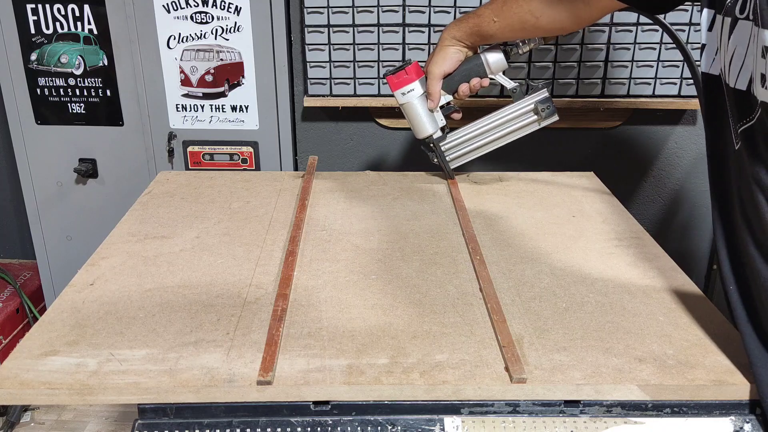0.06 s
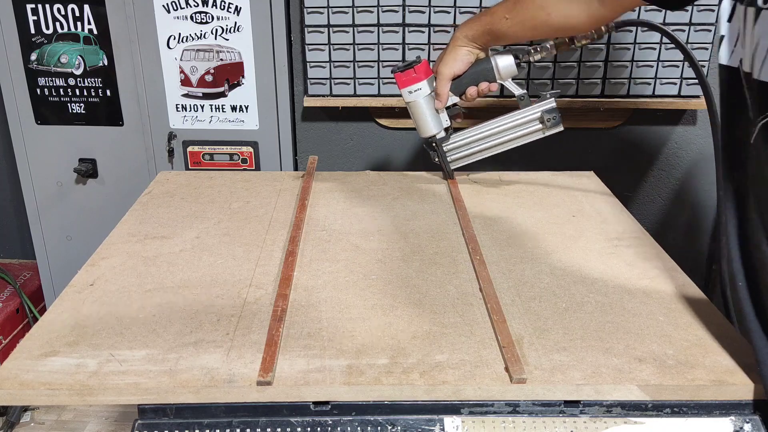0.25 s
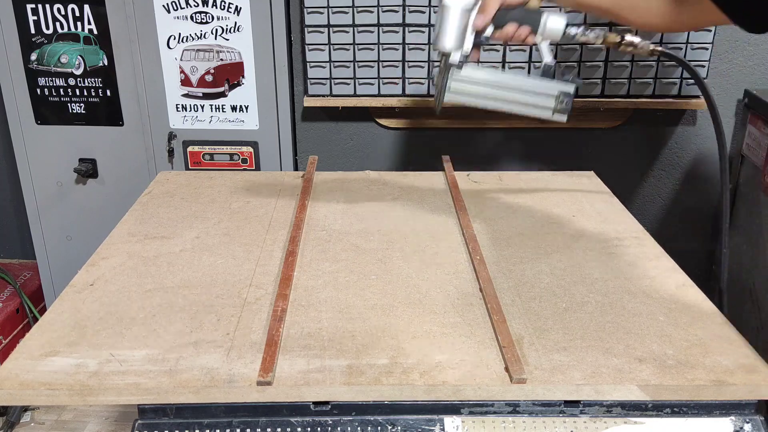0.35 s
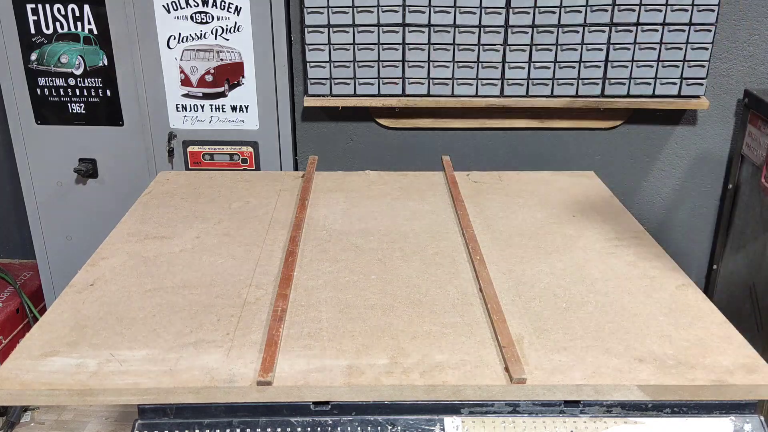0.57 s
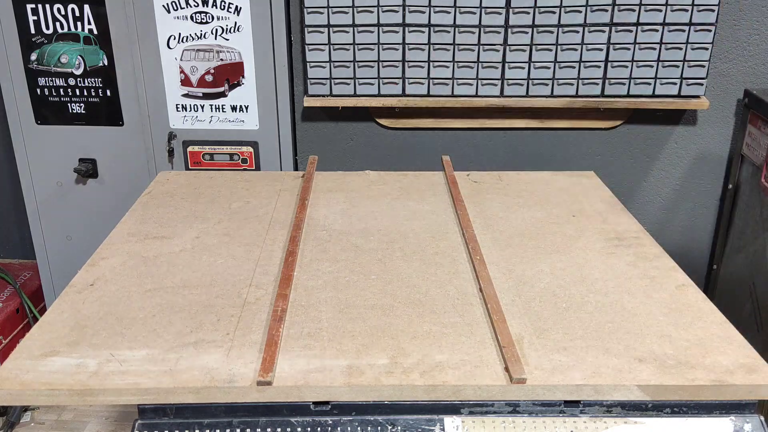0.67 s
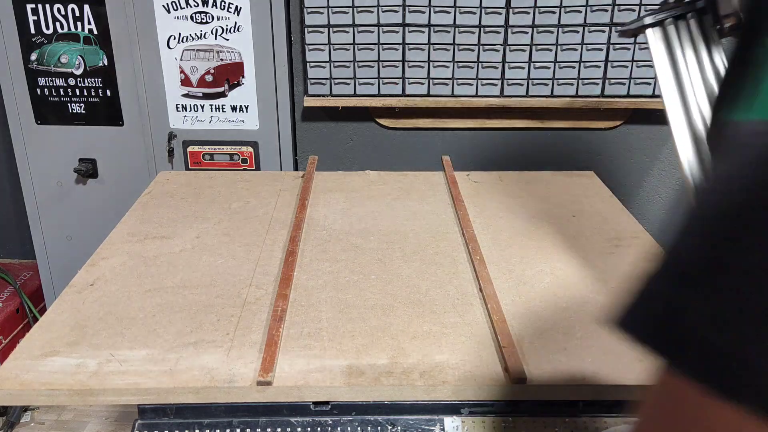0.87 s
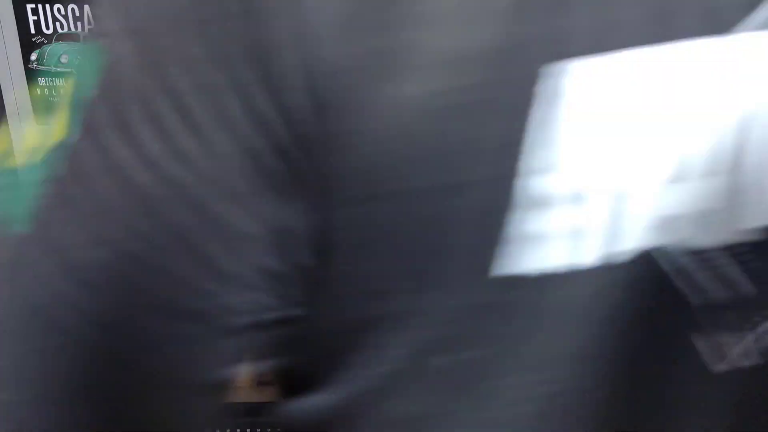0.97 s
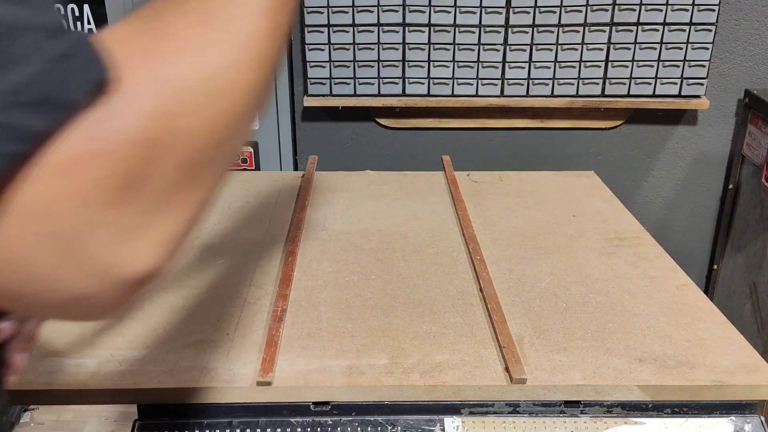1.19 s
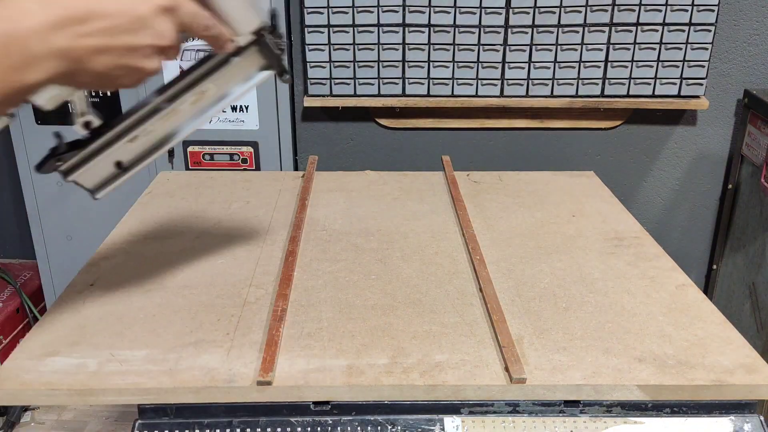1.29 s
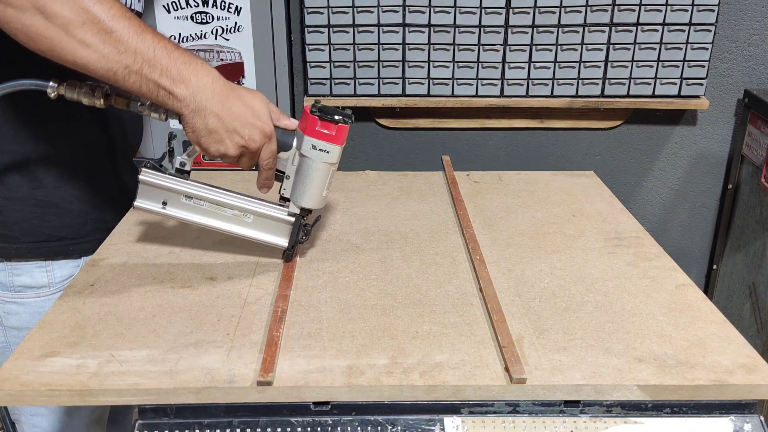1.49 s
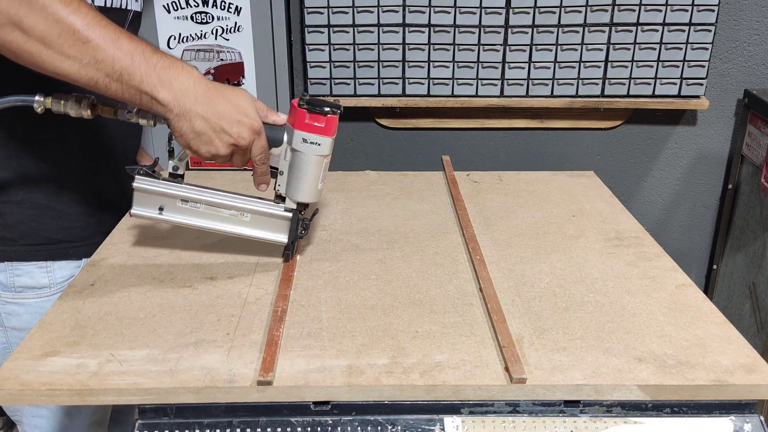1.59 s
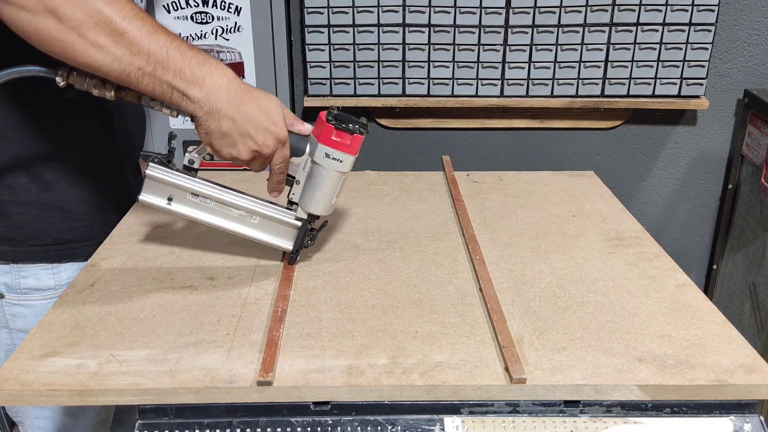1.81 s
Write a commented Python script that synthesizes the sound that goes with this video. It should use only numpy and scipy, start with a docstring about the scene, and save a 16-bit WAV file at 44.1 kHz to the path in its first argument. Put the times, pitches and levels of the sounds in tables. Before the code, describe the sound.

A pneumatic nailer fires once into wood at about 0.25 seconds: a quick click, a sharp crack with a brief metallic ring, and a puff of air, dying quickly in a small workshop. From 0.7 to 1.3 seconds, clothes rustle and swish quietly past the microphone, with faint dull knocks. Near 1.8 seconds the tool lands on the wood with a soft thud. A faint steady hiss lies underneath.

```python
"""A pneumatic nailer fires one brad through a wood strip into a board, in a small workshop.
Its valve snaps, the driver slams down and rebounds, ringing the metal body and the board,
and the spent air puffs out of the exhaust. Over a steady hiss, clothes and hose brush past
the microphone; then the nailer's nose is set down with a soft thud."""
import sys
import numpy as np
from scipy import signal
from scipy.fft import rfft, irfft
from scipy.io import wavfile
from scipy.ndimage import uniform_filter1d

SR = 44100
rng = np.random.default_rng(int(sys.argv[2]) if len(sys.argv) > 2 else 0)


def wav_record(signal):
    """Record a signal, one row per channel, as 16-bit PCM in the file named by sys.argv[1]."""
    frames = np.transpose(np.atleast_2d(signal))
    bounded = np.clip(frames, -1, 1)
    # unit amplitude maps onto the largest positive 16-bit level
    quanta = np.round(bounded * 32767).astype(np.int16)
    wavfile.write(sys.argv[1], SR, quanta)


N = 81585

# blows of the driver and the recoiling tool (time [s], crack level [dB], push on the board [dB])
BLOWS = [(0.2544, -20.5, -18), (0.2575, -15.5, -22), (0.2618, -9, -38), (0.2678, -12.5, -22),
         (0.2709, -13.5, -18), (0.276, -14.5, -28)]
# tone of a crack, from bass to treble (frequency [Hz], relative level [dB])
CRACK_TONE = [(60, -13.5), (250, -10), (500, -5), (850, -1.5), (1700, 3), (2300, -3.5), (4200, -2.5),
              (6500, -7), (8500, -14.5), (11000, -23), (16000, -18)]
def driver():
    """The driver, the rod that hits the nail, slams down: each blow is a sharp tick and a short crack."""
    power = 0
    for start, db, _ in BLOWS:
        crack = envelope(start, rise=0.0005, fade=0.047)
        tick = amp(-1.5) * envelope(start, rise=0.0005, fade=0.0028)
        power += (amp(db) * (crack + tick)) ** 2
    return shaped_noise(CRACK_TONE) * np.sqrt(power)

# high notes of the metal body and nail magazine (frequency [Hz], relative level [dB], fade time [s])
METAL_NOTES = [(1521, -18, 0.083), (1682, -3, 0.1), (1766, -6.5, .11), (1900, -19, .11), (2927, -17, 0.14),
               (3886, -16, .11), (4050, -7, 0.14), (4150, -13, 0.07), (4250, -14, .12), (4404, -21, 0.084),
               (4581, -11.5, 0.14), (4644, -16, .15), (6570, -11.5, 0.22), (8100, -18, 0.24)]
def metal_body():
    """The shot sets the metal ringing; left and right hear each note at a different point in its wave."""
    phases = rng.random((len(METAL_NOTES), 2, 1))
    start = BLOWS[1][0]  # the second blow
    ring = 0
    for (hz, db, fade), phase in zip(METAL_NOTES, phases):
        wave = np.sin(2 * np.pi * (hz * clock() + phase))
        ring += amp(db) * envelope(start, rise=0.003, fade=fade) * wave
    return amp(-13) * ring

# low and middle ringing notes of the board and the nailer's body
# (frequency [Hz], relative level [dB], fade time [s])
BOARD_AND_BODY_NOTES = [(137, -15, .12), (178, -11, 0.11), (275, -21.5, 0.12), (356, -14.5, 0.058),
                        (409.3, -8.5, .08), (575, -19.5, 0.12), (768, -3, .13), (903, -9.5, 0.12),
                        (993, 2, 0.15), (1073, -16, 0.16), (1130, -15, .13), (1160, -16, .13),
                        (1281, -16, .13)]
def board_and_body(pushes, contact_s, damping=1):
    """Pushes make the board and the nailer's body ring; a longer contact leaves only the low notes."""
    t = clock()
    ring = -sum(amp(db) * decay(t, fade / damping) * np.sin(2 * np.pi * hz * t)
                for hz, db, fade in BOARD_AND_BODY_NOTES)
    force = sum(amp(db) * np.sin(np.pi * np.clip((t - start) / contact_s, 0, 1)) ** 2
                for start, db in pushes)
    motion = signal.fftconvolve(force * 2 / (contact_s * SR), ring)[:N]
    # below 135 Hz the board moves little air
    return signal.sosfilt(signal.butter(3, 135, "high", fs=SR, output="sos"), motion)

# tone of the air jet (frequency [Hz], relative level [dB])
JET_TONE = [(40, -24), (200, -2.5), (600, -0.5), (1500, 0.5), (3000, -5.5), (4500, 3), (6500, 2), (8500, 2),
            (11000, -5.5), (16000, -14)]
# tone of the jet's brightest part (frequency [Hz], relative level [dB])
FIZZ_TONE = [(2000, -38), (6000, -5), (8500, -5.5), (11000, 5.5), (13000, -2), (16000, -3)]
# hollow notes of the exhaust cap (frequency [Hz], width [Hz], level [dB], fade time [s])
CAP_NOTES = [(865, 250, -35.5, 0.24), (1196, 305, -25.5, 0.18), (2285, 410, -27.5, 0.12),
             (4510, 750, -28.5, 0.11), (5910, 680, -30, 0.097)]
def exhaust():
    """Spent air jets out with a low whump and sounds the cap; it fizzes while the pressure is high."""
    start, rise = 0.2741, 0.0078  # seconds
    jet = amp(-20) * shaped_noise(JET_TONE) * envelope(start, rise, fade=0.11, hold=0.033)
    fizz = amp(-18.5) * shaped_noise(FIZZ_TONE) * envelope(0.2726, rise=0.014, fade=0.12, hold=0.015)
    hollow = sum(amp(db) * band(hz, width) * envelope(start, rise, fade, hold=0.031)
                 for hz, width, db, fade in CAP_NOTES)
    whump = amp(-32) * band(hz=108, width=77) * envelope(start, rise, fade=0.25)
    return (jet + fizz + hollow) * waver(rate_hz=560, depth_db=0.8) + whump

# snaps of the trigger valve (time [s], level [dB])
SNAPS = [(0.2388, -21), (0.241, -14.5), (0.245, -18.5), (0.25, -23)]
# tone of a snap (frequency [Hz], relative level [dB])
SNAP_TONE = [(100, -17), (600, -12), (2000, -17), (3000, -1.5), (3600, -7.5), (4100, -2.5), (5900, 0),
             (8500, -14), (11500, -5.5), (13000, -19), (16000, -14)]
def valve():
    """The trigger valve gives a few quick, bright snaps just before the shot."""
    power = sum((amp(db) * envelope(start, rise=0.00059, fade=0.024)) ** 2 for start, db in SNAPS)
    return shaped_noise(SNAP_TONE) * np.sqrt(power)

# touches of the nose on the wood strip (time [s], push on the board [dB])
NOSE_TOUCHES = [(1.7565, -32), (1.7697, -15.5), (1.7845, -20.5)]
def set_down():
    """The nose lands with a soft thud; the ringing fades faster with the tool resting on the board."""
    return board_and_body(NOSE_TOUCHES, contact_s=0.004, damping=2.2)

# loudness of the brushing clothes (time [s], level [dB])
BRUSH_LEVELS = [(.68, -63), (.74, -51.5), (.81, -42), (.94, -45.5), (1.06, -43), (1.13, -43), (1.17, -39.5),
                (1.22, -51), (1.4, -59), (1.85, -52.5)]
# tone of the brushing (frequency [Hz], relative level [dB])
BRUSH_TONE = [(80, -13), (300, -5.5), (900, -3), (1900, 0), (3000, 0.5), (4500, 0.5), (6500, 1),
              (9000, -4.5), (16000, -2.5)]
# loudness of the fine, high swish (time [s], level [dB])
SWISH_LEVELS = [(.69, -63), (.745, -38.5), (.79, -40), (.87, -46.5), (1.1, -51), (1.18, -36), (1.22, -43.5),
                (1.34, -45), (1.39, -50), (1.85, -51)]
# tone of the swish (frequency [Hz], relative level [dB])
SWISH_TONE = [(1000, -29), (5000, -6), (8500, 0), (12000, 1), (16000, 4)]
def brushing():
    """Clothes and hose brush past with a broad rustle and a high swish."""
    rustle = shaped_noise(BRUSH_TONE) * level(BRUSH_LEVELS)
    swish = shaped_noise(SWISH_TONE) * level(SWISH_LEVELS)
    return rustle + swish

# hollow note of the rubbing cloth (time [s], pitch [Hz], level [dB])
RUB_PATH = [(.76, 2393, -84), (.87, 2296, -61), (1.0, 2102, -59), (1.11, 1800, -53), (1.18, 1603, -52),
            (1.22, 1600, -76)]
def rubbing():
    """Rubbing cloth has a hollow note that sinks as it passes."""
    times, hz, db = np.transpose(RUB_PATH)
    phase = 2 * np.pi * np.cumsum(np.interp(clock(), times, hz)) / SR
    # multiplying low noise by a wave moves it up to the wave's pitch
    hollow = band(0, width=920) * np.cos(phase) - band(0, width=920) * np.sin(phase)
    return unit(hollow) * amp(np.interp(clock(), times, db))

# soft knocks (time [s], level [dB], fade time [s], treble cut above [Hz])
KNOCKS = [(0.438, -46.5, 0.32, 300), (.54, -54, 0.13, 250), (0.731, -43, 0.048, 704),
          (1.034, -51.5, 0.074, 250), (1.058, -52, 0.087, 447), (1.166, -45.5, 0.14, 590),
          (1.294, -50.5, 0.23, 506), (1.581, -55, 0.43, 402.5), (1.77, -47, 0.093, 650)]
# tone of a knock before its treble is cut (frequency [Hz], relative level [dB])
KNOCK_TONE = [(30, -28), (90, -7), (200, -2.5), (400, -2), (900, -3), (16000, -6)]
def knocks():
    """Handling the tool and moving about make soft, dull knocks."""
    source = shaped_noise(KNOCK_TONE)
    sound = 0
    for start, db, fade, hz in KNOCKS:
        dull = unit(signal.lfilter(*signal.butter(2, hz, fs=SR), source))
        sound += amp(db) * envelope(start, rise=0.0059, fade=fade) * dull
    return sound

# bounces off board, cabinet and wall (left delay [s], right delay [s], relative level [dB])
ECHOES = [(.0031, 0.0025, -10.5), (.0074, .0081, -15.5), (0.0136, .0121, -14.5), (0.0196, .0215, -22)]
def echoes(x):
    """Each nearby surface sends back one late, quieter copy of the sound."""
    def delayed(side, seconds):
        return np.pad(side, (round(seconds * SR), 0))[:N]
    return sum(amp(db) * np.array([delayed(x[0], left), delayed(x[1], right)])
               for left, right, db in ECHOES)

# how long sound lingers in the workshop (frequency [Hz], fade time [s])
ROOM_FADES = [(80, 0.8), (160, 0.68), (350, 0.29), (1200, 0.21), (4000, 0.25), (12000, .13)]
def room(x):
    """Many echoes blur into a short tail that lasts longest in the bass."""
    hz, t, spectrum = signal.stft(noise(1), SR, nperseg=512)
    spectrum = spectrum * decay(t, look_up(ROOM_FADES, hz)[:, None])
    tail = signal.istft(spectrum, SR, nperseg=512)[1][:, :N]
    delay_s = 0.0054
    tail = tail * np.clip(clock() / delay_s - 1, 0, 1)
    return signal.fftconvolve(x, tail / np.linalg.norm(tail[0]), axes=1)[:, :N]

# tone of the background hiss (frequency [Hz], relative level [dB])
HISS_TONE = [(25, -9), (80, 0), (200, 2.5), (400, -4), (700, -5), (1300, -8), (2200, -3), (3300, -4),
             (4500, 0.5), (6000, 2), (9000, -0.5), (11000, 2), (13500, -1.5), (15500, 1)]
def hiss():
    """A quiet, steady hiss lies under everything."""
    return amp(-42) * shaped_noise(HISS_TONE)

# how alike left and right sound (frequency [Hz], likeness [0-1])
LIKENESS = [(100, 0.93), (350, 0.83), (750, 0.42), (1500, 0), (3000, 0.02), (16000, .05)]
def noise(gain):
    """Stereo noise shaped by a gain for each frequency, alike on both sides in the bass."""
    left, other = rfft(rng.standard_normal((2, N)))
    same = np.clip(look_up(LIKENESS, frequencies()), 0, 1)
    right = same * left + np.sqrt(1 - same ** 2) * other
    return unit(irfft(np.array([left, right]) * gain, N))

def shaped_noise(tone):
    """Stereo noise that follows a tone table."""
    return noise(amp(look_up(tone, frequencies())))

def band(hz, width):
    """Stereo noise gathered around one pitch."""
    return noise(1 / (1 + ((frequencies() - hz) / width) ** 2) ** 2)

def decay(t, fade):
    """Dies away by 60 dB in each fade time."""
    return np.exp(-np.log(1000) * t / fade)

def envelope(start, rise, fade, hold=0):
    """Loudness that rises, holds, then dies away; all times are in seconds."""
    t = clock() - start
    return np.clip(t / rise, 0, 1) * decay(np.maximum(t - rise - hold, 0), fade)

def level(curve):
    """Gain that follows a table of times and levels."""
    return amp(np.interp(clock(), *np.transpose(curve)))

def waver(rate_hz, depth_db):
    """A random flutter in loudness."""
    spectrum = rfft(rng.standard_normal(N)) * np.exp(-(frequencies() / rate_hz) ** 2)
    return amp(depth_db * unit(irfft(spectrum, N)))

def amp(db):
    """Turns decibels into a gain, the number a sound is multiplied by."""
    return 10 ** (np.asarray(db) / 20)

def unit(x):
    """Scales a sound to an average strength (rms) of 1."""
    return x / np.sqrt(np.mean(x ** 2) + 1e-20)

def look_up(table, hz):
    """Reads between a table's rows, with frequencies spaced like musical pitch."""
    row_hz, value = np.transpose(table)
    return np.interp(np.log(hz + 1), np.log(row_hz + 1), value)

def clock():
    """Time of every sample."""
    return np.arange(N) / SR

def frequencies():
    """Frequency of every point in a spectrum."""
    return np.fft.rfftfreq(N, 1 / SR)

def scene():
    """The shot rings through the room; the set-down, handling noise and hiss have no echo."""
    thump = board_and_body([(start, push) for start, _, push in BLOWS], contact_s=0.0013)
    blast = driver() + exhaust()
    tool = valve() + blast + echoes(blast) + metal_body()
    tail = room(amp(-16) * tool + amp(-12) * thump)
    cloth = brushing() + rubbing()
    handling = knocks() + cloth * waver(rate_hz=110, depth_db=1.5)
    return tool + thump + set_down() + tail + handling + hiss()

# tone of the microphone's left opening (frequency [Hz], gain [dB])
LEFT_MIC_TONE = [(400, 0), (1000, 0.5), (3000, 1), (4500, 4.5), (5950, -6.5), (6250, -13), (7300, -7.5),
                 (7700, -5), (8400, 2), (9500, -8.5), (10300, -9.5), (10500, 4.5), (15800, 4.5)]
# tone of its right opening (frequency [Hz], gain [dB])
RIGHT_MIC_TONE = [(400, -0.5), (1000, 1.5), (3000, 2), (4500, 4.5), (5200, 1), (5800, 5), (6750, 4),
                  (7400, -9.5), (8000, -12), (10300, -18), (10500, -1.5), (15800, 2)]
def record(dry):
    """The sound is coloured, loud moments are turned down a little, and the highest treble is cut."""
    loud_db, turn_down_share, recover_db_per_s = -25, 0.094, 38
    ceiling, top_hz = 0.9, 15820
    tone = amp([look_up(LEFT_MIC_TONE, frequencies()), look_up(RIGHT_MIC_TONE, frequencies())])
    x = irfft(rfft(dry) * tone, N)
    power_db = 10 * np.log10(abs(uniform_filter1d((x ** 2).mean(0), size=400)) + 1e-12)
    fall_db = clock() * recover_db_per_s
    peak_db = np.maximum.accumulate(power_db + fall_db) - fall_db  # jumps up, sinks slowly
    over_db = np.maximum(peak_db - loud_db, 0)
    x = x / amp(turn_down_share * uniform_filter1d(over_db, size=200))
    x = x / (1 + (x / ceiling) ** 4) ** .25  # rounds off the tallest peaks
    treble_cut = signal.firwin(511, top_hz, window=("kaiser", 9), fs=SR)
    return signal.oaconvolve(x, treble_cut[None], "same")

dry = scene()
out = record(dry)
wav_record(out)
```